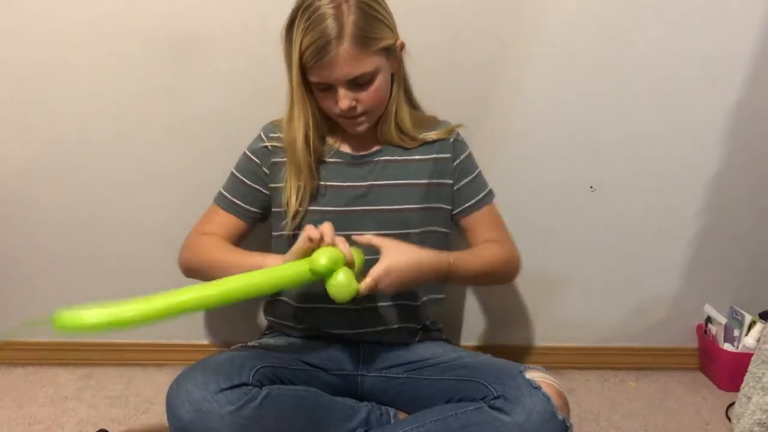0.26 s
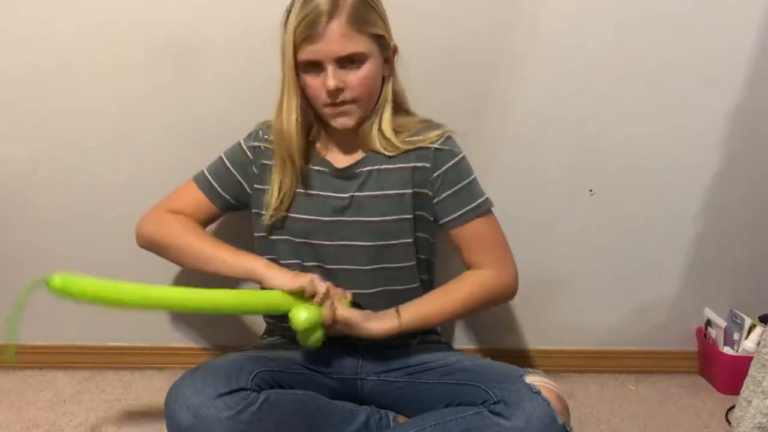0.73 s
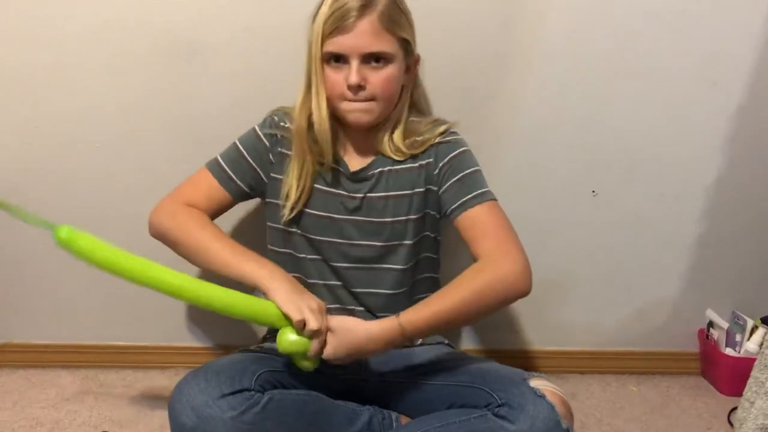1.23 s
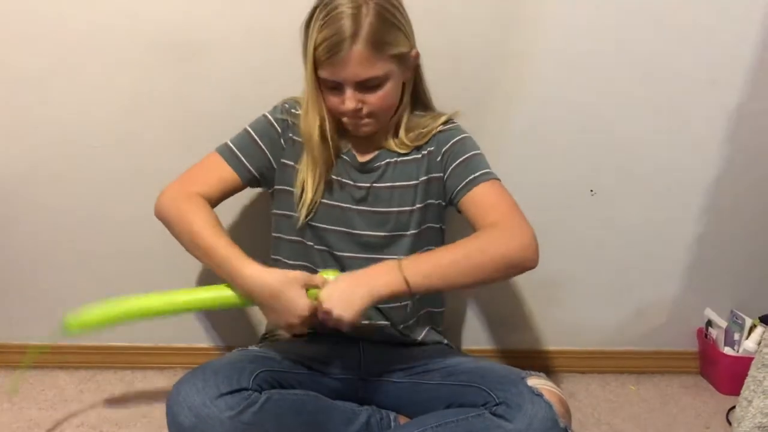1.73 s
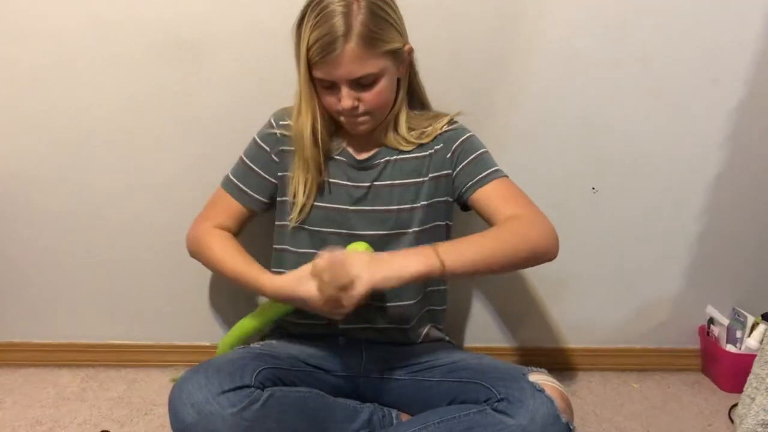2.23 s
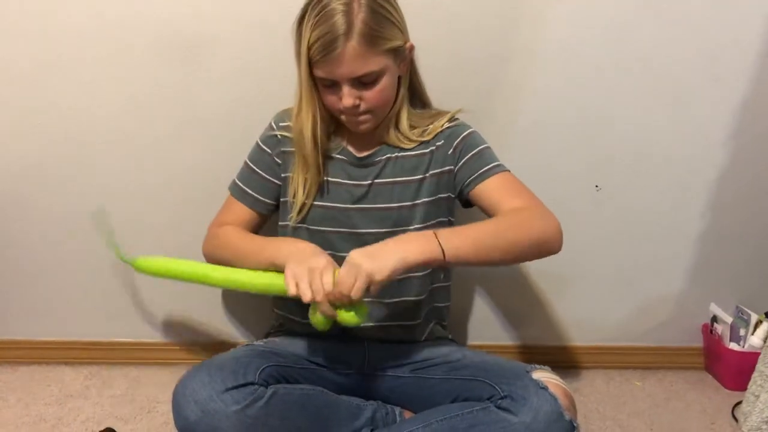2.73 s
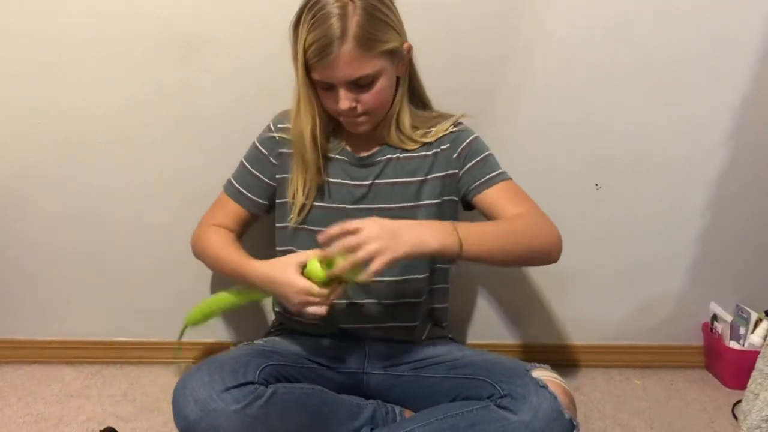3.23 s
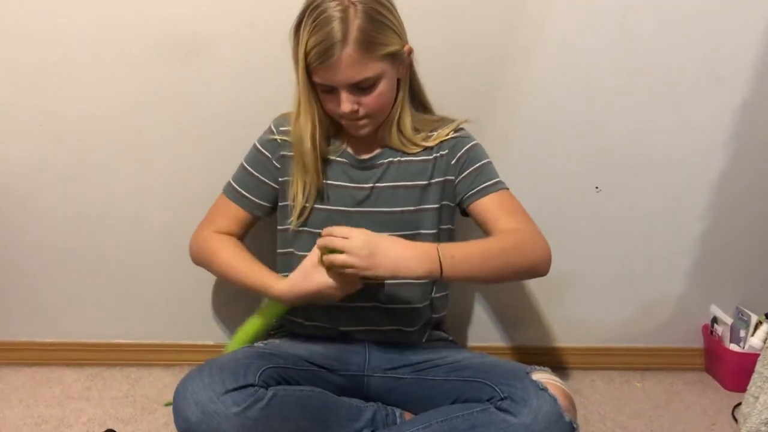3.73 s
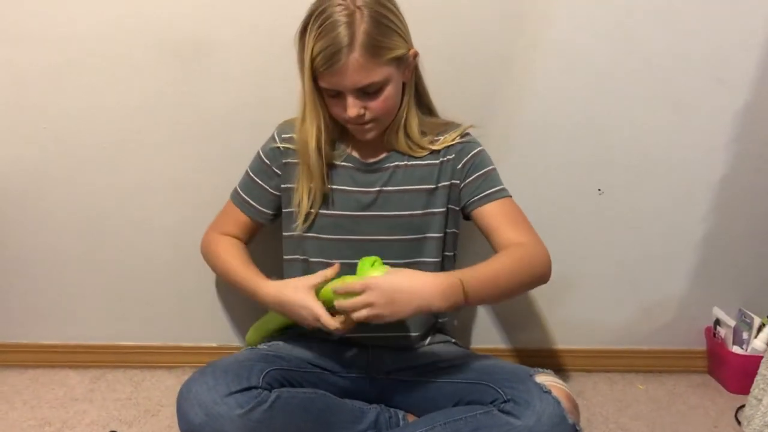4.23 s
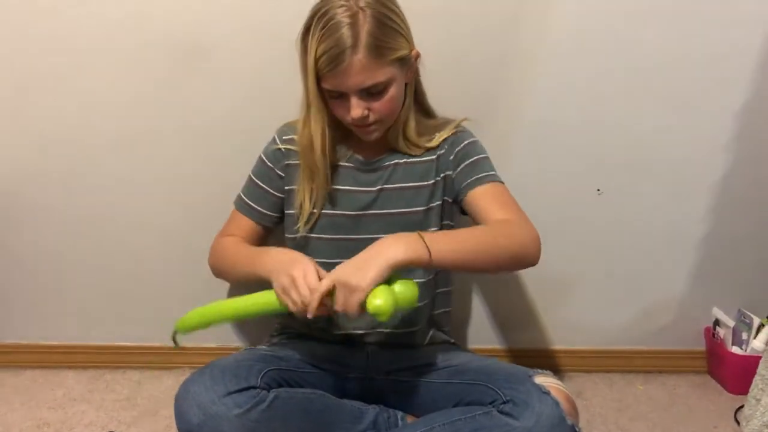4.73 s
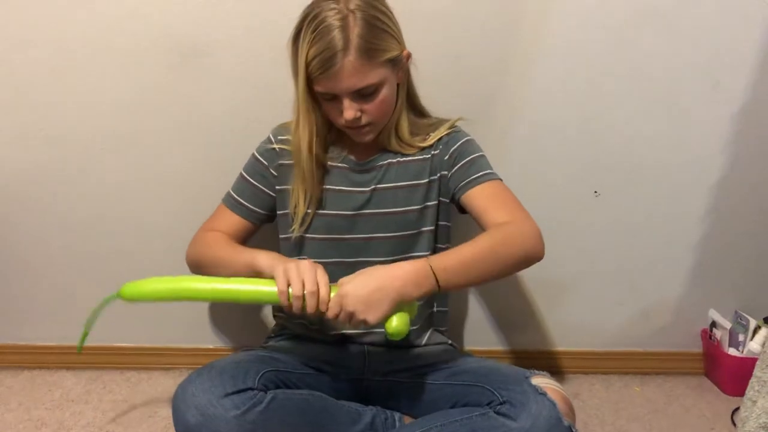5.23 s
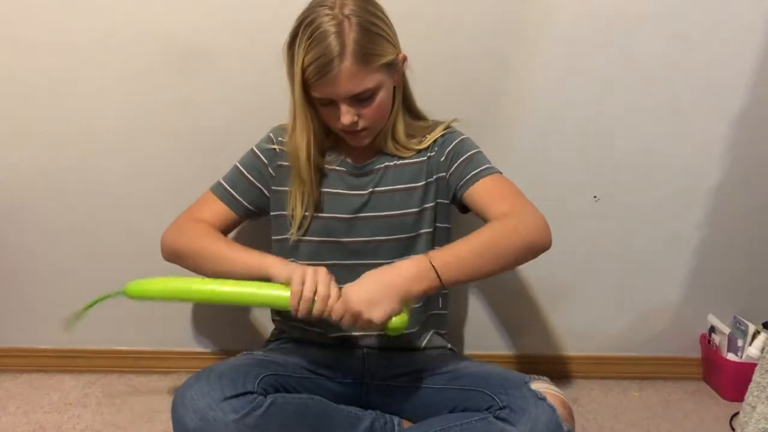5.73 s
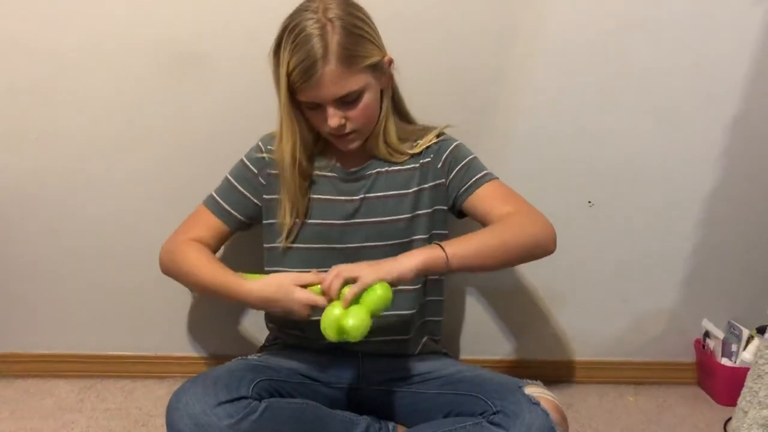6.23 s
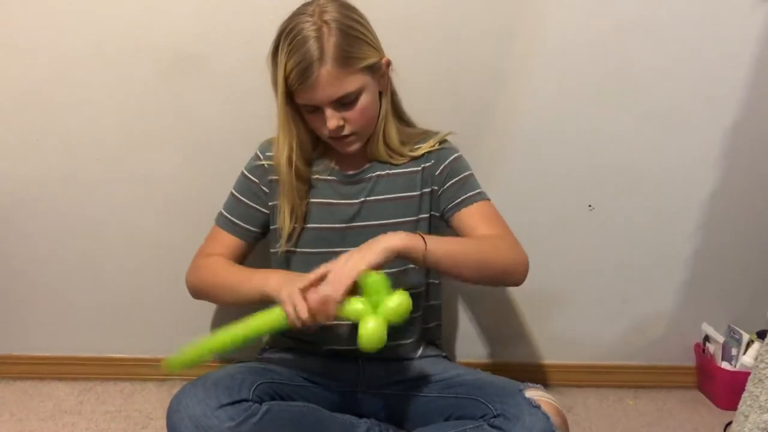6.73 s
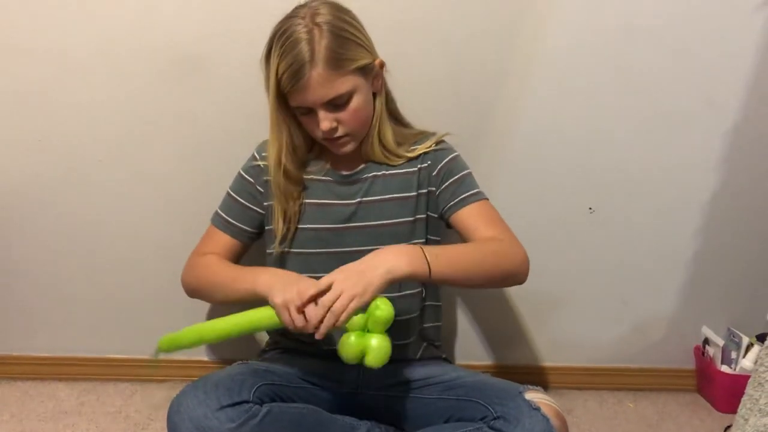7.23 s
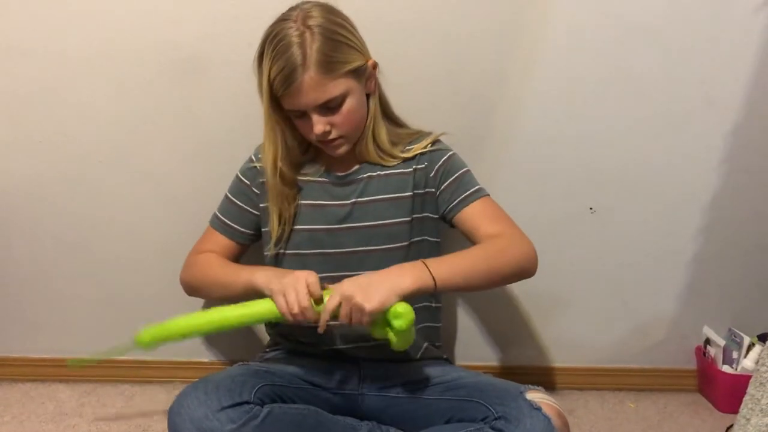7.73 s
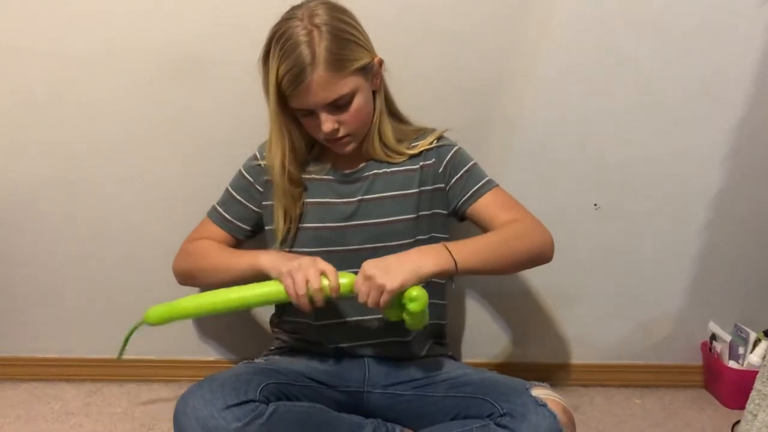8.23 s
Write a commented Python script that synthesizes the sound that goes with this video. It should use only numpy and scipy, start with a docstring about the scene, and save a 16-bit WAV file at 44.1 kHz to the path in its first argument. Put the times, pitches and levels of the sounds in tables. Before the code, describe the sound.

In a small carpeted room with a faint low mains hum, hands twist a long inflated balloon close to the microphone. It begins with soft rubbing, then sharp snaps and creaks just after one second. A squeaky cluster follows around two seconds, with more squeaks near three and a half. Irregular creaks and clicks continue, quieting around six and a half before a loud low groan and snaps near seven and a half.

```python
"""In a small carpeted room with a faint mains hum, hands twist a long inflated latex balloon.
Rubber sticks and slips: short bursts of very fast slips snap, runs of uneven slips creak, and slips that
lock to a period squeak. Slow slips ratchet or make the tube judder. Each slide of a hand adds a fine
crackling rub of skin on latex, made of many tiny clicks. Filters give these the colour of skin and tube,
and noise echoes add the room."""
import sys
import numpy as np
from scipy import signal
from scipy.fft import rfft, irfft, next_fast_len
from scipy.io import wavfile

SR = 44100
rng = np.random.default_rng(int(sys.argv[2]) if len(sys.argv) > 2 else 0)


def file_out(sig):
    """Save sig as 16-bit WAV at sys.argv[1]."""
    # one column per channel
    cols = np.atleast_2d(sig).T
    # limit, then scale
    lim = np.clip(cols, -1, 1)
    pcm = np.round(lim * 32767).astype(np.int16)
    wavfile.write(sys.argv[1], SR, pcm)


N = 373527  # length of the scene in samples
CUTOFF_HZ = 16650  # top of the finished sound


def from_db(db):
    """Turn decibels into a gain."""
    return 10 ** (np.asarray(db) / 20)


def rms_one(x):
    """Scale a sound to an rms (average strength) of 1."""
    return x / np.sqrt(np.mean(x ** 2) + 1e-20)


def at_hz(points, hz):
    """Read a table between its points, along a logarithmic frequency axis."""
    table_hz, value = np.transpose(points)
    return np.interp(np.log(np.maximum(hz, 1)), np.log(table_hz), value)


def coloured(x, points):
    """Filter a sound to the spectrum in a table, with no response ahead of its cause (minimum phase)."""
    size = next_fast_len(len(x) + 2048) // 2 * 2
    gain = from_db(at_hz(points, np.fft.rfftfreq(size, 1 / SR)))
    # folding the cepstrum forward in time gives the minimum phase
    cepstrum = irfft(np.log(gain))
    cepstrum[1:size // 2] *= 2
    cepstrum[size // 2 + 1:] = 0
    return irfft(rfft(x, size) * np.exp(rfft(cepstrum)))[:len(x)]


def wander(size, rate):
    """Waver randomly around 0: `rate` new random values a second, joined by straight lines."""
    at = np.arange(size) * rate / SR
    return np.interp(at, np.arange(size), rng.standard_normal(size))


def resonance(x, hz, width_hz):
    """Ring at one pitch: a two-pole resonance with a gain of 1 at its peak."""
    r = np.exp(-np.pi * width_hz / SR)
    feed = np.array([1, 0, -1]) * (1 - r * r) / 2
    return signal.lfilter(feed, [1, -2 * r * np.cos(2 * np.pi * hz / SR), r * r], x)


def above(x, hz):
    """Gently remove what lies below a frequency."""
    return signal.sosfilt(signal.butter(2, hz, "high", fs=SR, output="sos"), x)


def stroke(length, rise, fall):
    """Give the time axis and loudness shape of one movement (all in s): it rises, holds and dies."""
    t = np.arange(SR // 3) / SR
    return t, (1 - np.exp(-t / rise)) * np.exp(-np.maximum(t - length, 0) / fall)


def add(track, start_s, sound, length, level_db):
    """Mix a sound into the track, scaled so its energy spread over its length gives the level."""
    at = int(start_s * SR)
    sound = sound * from_db(level_db) * np.sqrt(length * SR / (np.sum(sound ** 2) + 1e-20))
    track[at:at + len(sound)] += sound[:N - at]


# the mains hum: pitch_hz, level_db (rms)
HUM_TONES = [(120, -49), (240, -62.5)]


def mains_hum():
    """The mains hums as steady sine tones."""
    t = np.arange(N) / SR
    hum = np.zeros(N)
    for hz, level_db in HUM_TONES:
        hum += from_db(level_db) * np.sqrt(2) * np.sin(2 * np.pi * (hz * t + rng.random()))
    return hum


# colour of the still air in the room: frequency_hz, relative_level_db
AIR_COLOUR = [(30, -22), (62, -5), (95, 2), (150, -6.5), (300, -15), (1500, -20), (16000, -35)]


def room_air(level_db=-53.5):
    """The hush of the room is steady filtered noise."""
    return from_db(level_db) * rms_one(coloured(rng.standard_normal(N), AIR_COLOUR))


# how long echoes take to fade by 60 dB: frequency_hz, fade_s
ECHO_FADE = [(200, 0.29), (8000, 0.23), (16000, 0.074)]


def room_response(early_db=-9.5, early_s=0.02, late_db=-11.0):
    """The wall and floor close by answer at once; a soft tail follows, shorter in the treble."""
    t = np.arange(SR // 2) / SR
    edges_hz = np.geomspace(100, 18000, 8)
    tail = 0
    for low, high in zip(edges_hz, edges_hz[1:]):
        band_filter = signal.butter(2, [low, high], "band", fs=SR, output="sos")
        band = signal.sosfilt(band_filter, rng.standard_normal(len(t)))
        tail = tail + band * np.exp(-np.log(1000) * t / at_hz(ECHO_FADE, np.sqrt(low * high)))
    sparse = rng.standard_normal(len(t)) * (rng.random(len(t)) < .08)
    early = sparse * np.exp(-t / early_s) * (t > .002)
    late = tail * (t > .006)
    return (from_db(early_db) * rms_one(early) + from_db(late_db) * rms_one(late)) / np.sqrt(len(t))


def room(x, count=14):
    """The balloon is turned about, so its echoes pass from one pattern to the next."""
    place = np.linspace(0, count - 1, N)
    out = x
    for k in range(count):
        share = np.sqrt(np.maximum(1 - abs(place - k), 0))
        out = out + signal.oaconvolve(x * share, room_response())[:N]
    return out


def slips(per_s, unevenness, spread_db):
    """Stretched rubber clicks whenever it lets go; the first click comes at once."""
    size = len(per_s)
    rate = per_s * np.exp(unevenness * wander(size, per_s.mean()))
    load = np.cumsum(rate) / SR
    lets_go = np.diff(np.floor(load), prepend=-1) > 0
    return lets_go * from_db(spread_db * rng.standard_normal(size))


def membrane(clicks, scatter, scatter_s):
    """Each slip sends ripples round the skin: part repeats from slip to slip, part is scattered anew."""
    t = np.arange(SR // 100) / SR
    decay = np.exp(-1 / (scatter_s * SR))
    energy = signal.lfilter([1 - decay ** 2], [1, -decay ** 2], clicks ** 2 + 1e-18)
    ripple = rng.standard_normal(len(t)) * np.exp(-t / scatter_s)
    ripple /= np.sqrt(np.sum(ripple ** 2))
    repeated = signal.fftconvolve(clicks, ripple)[:len(clicks)]
    return repeated + scatter * np.sqrt(energy) * rng.standard_normal(len(clicks))


# how the latex skin gives off the sound of a slip: frequency_hz, gain_db
SKIN_COLOUR = [(150, -27), (350, 0.5), (700, 7.5), (1100, 1), (6000, -1), (9000, -5), (12000, -9.5),
               (16000, -21.5)]


def patch(x, hz, ring_db, relative_width, low_edge):
    """The free patch of skin beside the grip rings, and radiates little below its ring."""
    x = above(x, hz * low_edge)
    ring = resonance(x, hz, hz * relative_width)
    return coloured(x + from_db(ring_db) * ring, SKIN_COLOUR)


# slides of a hand over the latex: start_s, length_s, level_db (at the start, before the sag),
# tube_db (hollow tube against the rub, before the tube's lift in rub())
HAND_SLIDES = [(0.072, 0.38, -47, -9.5), (0.398, 0.27, -48, -14), (0.648, 0.11, -44.5, -8),
               (0.916, 0.55, -47.5, -3), (1, 0.1, -37, -8), (1.185, 0.69, -37, -13.5),
               (1.696, 0.078, -30, -10.5), (1.87, 0.21, -38.5, -13), (2.01, 0.16, -45, -11.5),
               (2.2, 0.15, -42, -2.5), (2.508, 0.22, -49, -6.5), (2.762, 0.24, -44.5, -22),
               (2.871, 0.15, -35, -6.5), (3.04, 0.2, -43.5, -3.5), (3.361, 0.1, -44.5, -11),
               (3.5, 0.12, -34, -19), (3.644, 0.1, -43, -8), (3.727, 0.12, -36.5, -8),
               (3.841, 0.28, -44.5, -3), (4.274, 0.12, -47, -10.5), (4.592, 0.27, -48.5, -10.5),
               (4.897, 0.24, -38.5, -19.5), (5.331, 0.26, -43, -12), (5.56, 0.14, -49.5, -4),
               (5.714, 0.26, -43.5, -8.5), (5.964, 0.33, -44.5, -18), (6.149, 0.35, -43.5, -5),
               (6.463, 0.32, -53.5, -7.5), (6.737, 0.24, -48, -22), (6.933, 0.15, -38, -12),
               (7.158, 0.082, -52, -1.5), (7.313, 0.098, -40, -5), (7.452, 0.19, -33.5, -12.5),
               (7.788, 0.079, -36.5, -11.5), (7.998, 0.26, -34.5, -12.5), (8.297, 0.17, -46.5, -12.5)]
SLIDE_ATTACK_S, SLIDE_RELEASE_S = 0.0037, 0.024
SLIDE_SAG_DB_PER_S = 3  # the push eases as the hand runs on
HOLD_DB = -65  # rub of hands that merely hold the balloon
HOLD_TUBE_DB = -20  # hollow tube against that rub, before the tube's lift


def slide_gains():
    """Friction over time for rub and hollow tube: each slide takes hold, eases and lets go."""
    t = np.arange(N) / SR
    # powers are summed, so overlapping slides add like separate noises
    fine_power = np.full(N, from_db(HOLD_DB) ** 2)
    tube_power = np.full(N, from_db(HOLD_DB + HOLD_TUBE_DB) ** 2)
    for start_s, length, level_db, tube_db in HAND_SLIDES:
        span = slice(int(start_s * SR), int((start_s + 1) * SR))
        age = np.maximum(t[span] - start_s, 0)
        takes_hold = 1 - np.exp(-age / SLIDE_ATTACK_S)
        lets_go = np.exp(-np.maximum(age - length, 0) / SLIDE_RELEASE_S)
        gain = takes_hold * lets_go * from_db(level_db - SLIDE_SAG_DB_PER_S * age)
        fine_power[span] += gain ** 2
        tube_power[span] += (gain * from_db(tube_db)) ** 2
    return np.sqrt(fine_power), np.sqrt(tube_power)


# colour of the fine rub: frequency_hz, relative_level_db
FINE_RUB_COLOUR = [(500, -20), (1000, 2), (1800, 8), (3200, 6), (6000, 2.5), (9000, 0), (12000, -4.5),
                   (16000, -15.5)]
# colour of the air-filled tube under the hands: frequency_hz, relative_level_db
HOLLOW_COLOUR = [(80, -24.5), (180, 2), (380, 0.5), (650, 7), (1100, -3), (2000, -15), (4000, -64.5)]


def rub(fine_gain, tube_gain, tube_lift_db=2.0, grains_per_s=650, grain_spread_db=2.5, clump_db=4.0):
    """Skin on latex crackles in tiny slips, with the tube's hollow body under them."""
    born = rng.random(N) < grains_per_s / SR
    grain_db = grain_spread_db * np.minimum(rng.exponential(1, N), 4)
    sizes = from_db(grain_db + clump_db * wander(N, 60))
    clicks = born * sizes * rng.choice([-1, 1], N)
    grains = membrane(clicks, scatter=1.74, scatter_s=0.0019)
    fine = fine_gain * rms_one(coloured(grains, FINE_RUB_COLOUR))
    hollow = tube_gain * rms_one(coloured(grains, HOLLOW_COLOUR))
    return fine + from_db(tube_lift_db) * hollow


# the tube judders in the grip: start_s, length_s, level_db
TUBE_JUDDERS = [(0.819, 0.038, -45.5), (2.923, 0.042, -38.5), (5.573, 0.034, -40.5)]


def judders(per_s=110, ring_hz=235, width_hz=110):
    """Slow slips shake the whole air-filled tube, which answers with a low flutter."""
    out = np.zeros(N)
    for start_s, length, level_db in TUBE_JUDDERS:
        t, shape = stroke(length, rise=0.0025, fall=.006)
        run = slips(np.full(len(t), per_s), unevenness=0.55, spread_db=5.5) * shape
        flutter = resonance(resonance(run, ring_hz, width_hz), ring_hz, width_hz)
        add(out, start_s, flutter, length, level_db)
    return out


# slow, nearly even slips: start_s, length_s, slips_per_s, level_db
RATCHET_RUNS = [(0.5, 0.27, 64, -46), (1.792, 0.08, 166, -28), (6.423, 0.02, 170, -41)]


def ratchets(low_hz=700):
    """Tightly wrung rubber gives way notch by notch."""
    out = np.zeros(N)
    for start_s, length, per_s, level_db in RATCHET_RUNS:
        t, shape = stroke(length, rise=0.0002, fall=0.004)
        clicks = slips(np.full(len(t), per_s), unevenness=.2, spread_db=1.5)
        run = membrane(clicks, scatter=0.7, scatter_s=0.0024)
        add(out, start_s, coloured(above(run * shape, low_hz), SKIN_COLOUR), length, level_db)
    return out


# runs of uneven slips: start_s, length_s, level_db (before the trim in creaks()), ring_hz; the row ringing at
# 11000 Hz is a dry hiss of skin sliding on the latex
CREAK_RUNS = [(0.306, 0.05, -33.5, 1505), (0.823, 0.015, -30.5, 1117), (1.009, 0.055, -25.5, 3057),
              (1.53, 0.025, -30.5, 2600), (1.638, 0.0084, -24.5, 2090), (1.739, 0.011, -26.5, 563),
              (2.022, 0.057, -26.5, 2477), (2.103, 0.063, -24, 1698), (2.411, 0.016, -36, 2020),
              (2.559, 0.011, -22.5, 2540), (2.832, 0.0075, -28.5, 3400), (2.894, 0.039, -25, 2180),
              (2.942, 0.062, -36, 480), (3.48, 0.021, -28.5, 2116), (3.554, 0.045, -24.5, 3313),
              (3.747, 0.037, -26, 2893), (5.044, 0.027, -26.5, 3350), (5.306, 0.029, -33.5, 1685),
              (5.388, 0.011, -21, 2240), (6.001, 0.029, -32.5, 2006), (6.11, 0.083, -34.5, 3394),
              (6.528, 0.012, -34.5, 926), (6.701, 0.03, -44, 11000), (7.296, 0.019, -35.5, 898),
              (7.584, 0.048, -21, 4604), (7.813, 0.026, -20.5, 3920), (8.041, 0.078, -36, 3080),
              (8.238, 0.0093, -25, 1773)]
CREAK_SLIPS_PER_S = 380  # in a creak of the usual length and ring
USUAL_CREAK_S, USUAL_RING_HZ = .03, 2011
HASTE, TAUTNESS = .3, .5  # exponents: a shorter jerk and a tauter patch both slip faster


def creaks(trim_db=-1.5):
    """Rubber drags over rubber in a run of uneven slips; with a very high ring the run is a dry hiss of skin
    sliding on the latex."""
    out = np.zeros(N)
    for start_s, length, level_db, hz in CREAK_RUNS:
        hurry = (USUAL_CREAK_S / length) ** HASTE
        per_s = CREAK_SLIPS_PER_S * hurry * (hz / USUAL_RING_HZ) ** TAUTNESS
        t, shape = stroke(length, rise=0.00023, fall=0.011)
        clicks = slips(np.full(len(t), per_s), unevenness=.32, spread_db=3.0)
        run = membrane(clicks, scatter=0.76, scatter_s=0.0028)
        creak = patch(run * shape, hz, ring_db=0.5, relative_width=0.63, low_edge=0.34)
        add(out, start_s, creak, length, level_db + trim_db)
    return out


# snaps, each a brief burst of fast slips: start_s, length_s, level_db (before the lift in snaps()), ring_hz
SNAP_BURSTS = [(0.418, 0.002, -32, 5170), (0.435, 0.00052, -25.5, 3740), (0.8219, 0.0061, -18, 1130),
               (0.9948, 0.00065, -23.5, 6900), (1.027, 0.007, -20, 7000), (1.098, 0.0065, -16.5, 2920),
               (1.148, 0.006, -14, 3130), (1.269, 0.0024, -23.5, 3020), (1.443, 0.002, -29, 5100),
               (1.464, 0.0051, -30.5, 4550), (1.585, 0.003, -28, 3040), (1.62, 0.003, -24, 1400),
               (1.7045, 0.0016, -19, 1680), (1.745, 0.0025, -16.5, 5600), (1.965, 0.0024, -26, 2040),
               (1.9797, 0.0012, -22, 3400), (1.999, 0.0017, -20, 1760), (2.0075, 0.0019, -25.5, 1990),
               (2.0946, 0.0014, -17.5, 1730), (2.102, 0.0029, -15.5, 1640), (2.209, 0.016, -31.5, 1490),
               (2.616, 0.0037, -29, 1050), (2.742, 0.0024, -28.5, 3020), (3.146, 0.0018, -31, 2000),
               (3.811, 0.00098, -28.5, 1590), (3.825, 0.001, -25, 1900), (4.126, 0.0035, -34.5, 3270),
               (5.495, 0.0018, -22, 3120), (5.724, 0.003, -32, 1920), (5.7717, 0.0016, -24, 3370),
               (5.797, 0.0027, -20, 2920), (5.854, 0.0019, -25, 4220), (5.877, 0.005, -23, 3240),
               (5.897, 0.0031, -21.5, 3050), (6.916, 0.0024, -25.5, 1670), (7.445, 0.002, -23.5, 1980),
               (7.518, 0.011, -19, 2160), (8.026, 0.0048, -28.5, 4040), (8.212, 0.0051, -19.5, 1930),
               (8.225, 0.0039, -21, 2130), (8.235, 0.0016, -20.5, 3000), (8.353, 0.0035, -31, 2380),
               (8.424, 0.0073, -35, 1700)]


def snaps(lift_db=1.5):
    """The grip breaks and gives way in a few milliseconds of fast chatter."""
    out = np.zeros(N)
    for start_s, length, level_db, hz in SNAP_BURSTS:
        t, shape = stroke(length, rise=0.000076, fall=0.00031)
        clicks = slips(np.full(len(t), 2000.), unevenness=.3, spread_db=4.5)  # 2000 slips a second
        chatter = membrane(clicks, scatter=1.0, scatter_s=0.00031)
        snap = patch(chatter * shape, hz, ring_db=2.5, relative_width=0.2, low_edge=0.82)
        add(out, start_s, snap, length, level_db + lift_db)
    return out


OVERTONE_SMEAR_TURNS = .022  # phase waver added per overtone
SLIPS_PER_LIMP = 3


def squeak(length, first_hz, last_hz, rough, slope_db, jitter=.17, edge_db=-4.5, edge_hz=1000,
           dull_hz=2400, arch_per_s=0.8, limp=4.2, low_hz=370):
    """Slips lock to a ring of the skin: a gliding tone with a rasping edge that grows with roughness."""
    t, shape = stroke(length, rise=min(length * 0.1, .005), fall=0.0021)
    size = len(t)
    # the longer the push, the more the pitch bends up midway
    arch = arch_per_s * length * np.sin(np.pi * np.minimum(t / length, 1))
    glide = np.interp(t, [0, length], [first_hz, last_hz])
    pitch = glide * np.exp(arch + jitter * rough * wander(size, first_hz * 0.45))
    turns = np.cumsum(pitch) / SR
    tone = 0
    for k in range(1, min(15, int(CUTOFF_HZ / last_hz))):
        # higher overtones hold their phase less well, and the latex damps them
        smear = OVERTONE_SMEAR_TURNS * (k - 1) * wander(size, 315.0)
        phase = k * turns + rng.random() + smear
        strength_db = slope_db * np.log2(k) + 11.0 * rough * wander(size, first_hz * 0.28)
        strength = from_db(strength_db) / np.hypot(1, k * first_hz / dull_hz)
        tone = tone + strength * np.sin(2 * np.pi * phase)
    # on a rough patch every third slip is the strongest, which adds side tones
    tone = tone * (1 + min(limp * rough ** 2, 1) * np.cos(2 * np.pi * turns / SLIPS_PER_LIMP))
    lets_go = np.diff(np.floor(turns), prepend=0) > 0
    clicks = lets_go * from_db(20.0 * rough * rng.standard_normal(size))
    ripples = membrane(clicks, scatter=0.81, scatter_s=0.00063)
    edge = coloured(above(ripples, max(first_hz * 0.8, edge_hz)), SKIN_COLOUR)
    voice = (1 - min(rough, 1)) * rms_one(tone) + from_db(edge_db) * 3 * rough * rms_one(edge)
    return above(voice * shape, max(first_hz * .5, low_hz))


# periodic slipping: start_s, length_s, first_pitch_hz, last_pitch_hz, level_db, roughness (0 to 1),
# overtone_slope_db (per octave, before the latex damps the overtones)
TWIST_SQUEAKS = [ (2.107, 0.066, 823, 850, -27.5, 0.45, -13), (2.112, 0.053, 1584, 1767, -21, 0.33, -21),
                 (2.558, 0.0099, 673, 582, -29, 0.28, -12), (3.177, 0.032, 1804, 1538, -21, 0.34, 2),
                 (3.185, 0.04, 800, 705, -26.5, 0.27, -6), (3.519, 0.084, 2236, 2327, -33, 0.38, -3),
                 (3.606, 0.019, 2680, 3144, -24.5, 0.18, -1), (4.873, 0.058, 739, 727, -31.5, 0.2, -3),
                 (5.052, 0.025, 1600, 1830, -25, 0.3, -14), (5.19, 0.033, 583, 487, -33.5, 0.28, -2),
                 (6.109, 0.017, 2020, 1824, -28, 0.2, -15), (6.166, 0.025, 1388, 1336, -29, 0.37, -19),
                 (6.291, 0.047, 751, 592, -29.5, 0.19, -6), (6.703, 0.022, 630, 570, -41, 0.2, -13),
                 (7.017, 0.0167, 570, 539, -34, 0.18, -1.5), (7.201, 0.022, 1284, 1289, -36.5, 0.32, -17),
                 (7.293, 0.02, 1318, 988, -34, 0.14, -12), (7.541, 0.088, 296.5, 324.2, -22, 0.19, -1),
                 (7.815, 0.034, 323, 309.7, -28.5, 0.45, -3), (8.027, 0.1, 1650, 1497, -29.5, 0.38, -11),
                 (8.113, 0.018, 769, 762, -28.5, 0.21, -5)]


def squeaks():
    """The twist squeaks and groans loudly where slips fall into a steady period."""
    out = np.zeros(N)
    for start_s, length, first_hz, last_hz, level_db, rough, slope_db in TWIST_SQUEAKS:
        add(out, start_s, squeak(length, first_hz, last_hz, rough, slope_db), length, level_db)
    return out


def scene():
    """The balloon sounds with its echoes, over the hum and hush of the room."""
    balloon = rub(*slide_gains()) + judders() + ratchets() + creaks() + snaps() + squeaks()
    return (mains_hum() + room_air() + room(balloon))[None]


def record(dry):
    """Cut the top steeply."""
    steep = signal.ellip(10, .2, 80, CUTOFF_HZ, fs=SR, output="sos")
    return signal.sosfilt(steep, dry)


dry = scene()
out = record(dry)
file_out(out)
```